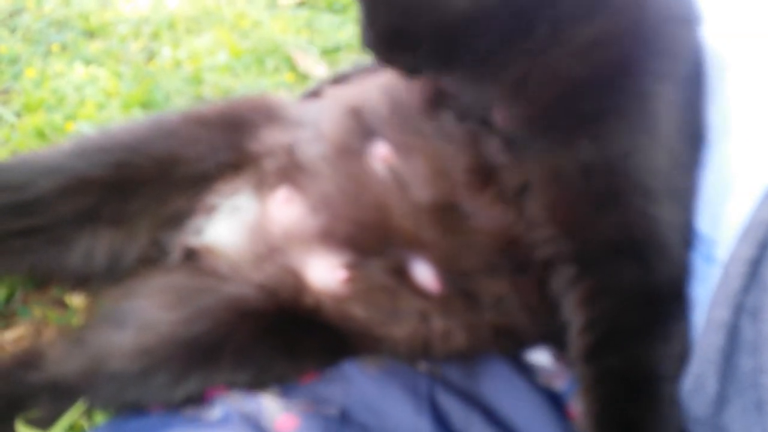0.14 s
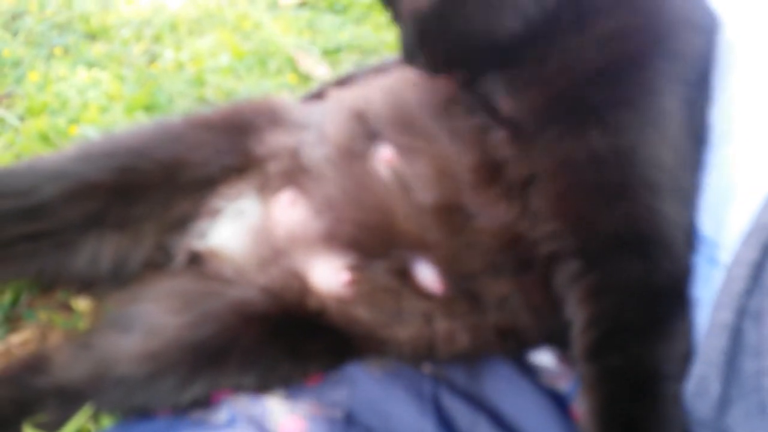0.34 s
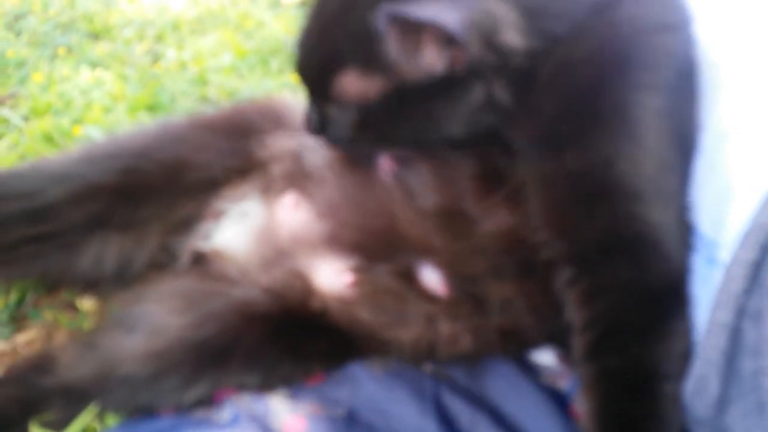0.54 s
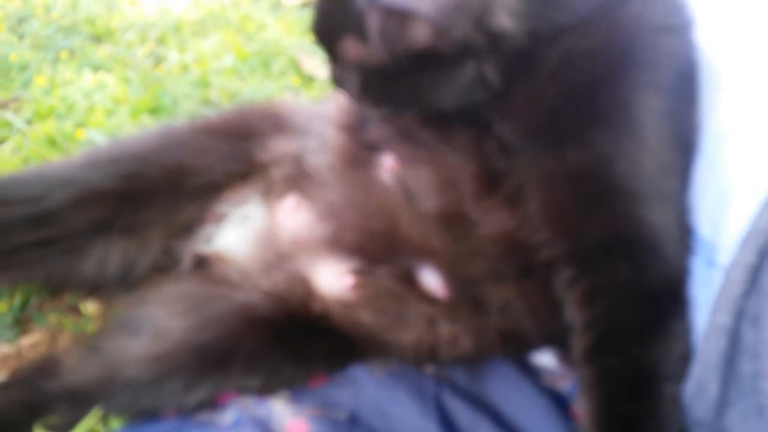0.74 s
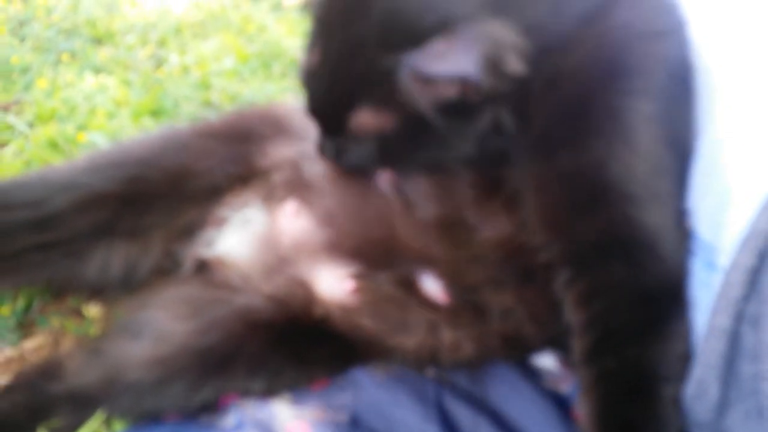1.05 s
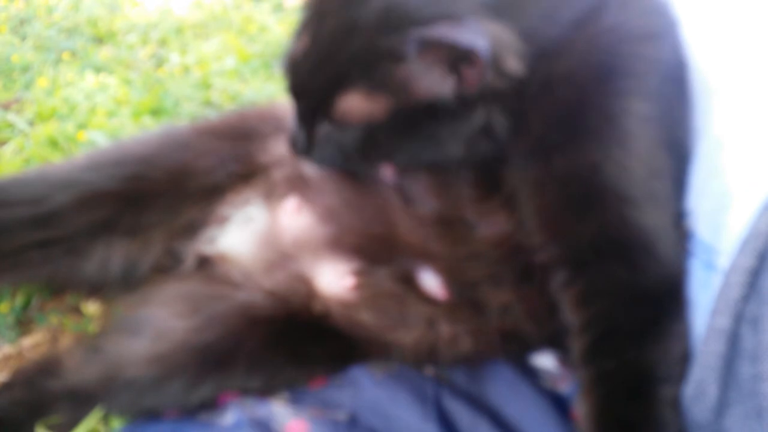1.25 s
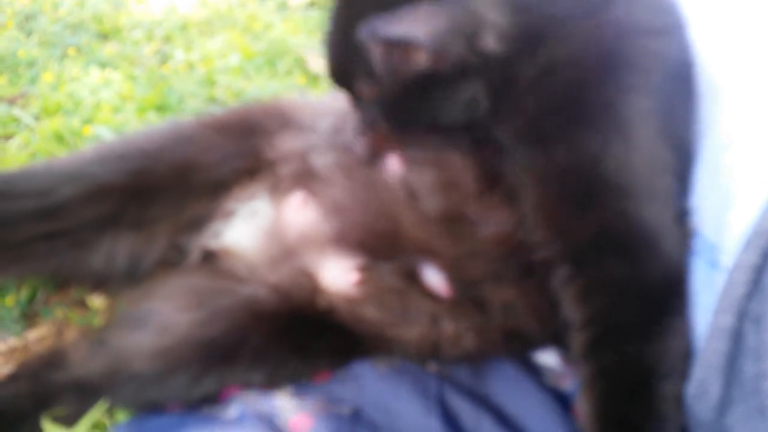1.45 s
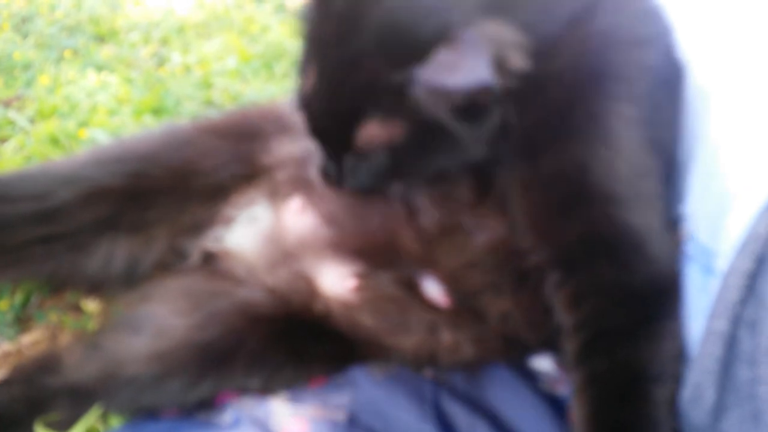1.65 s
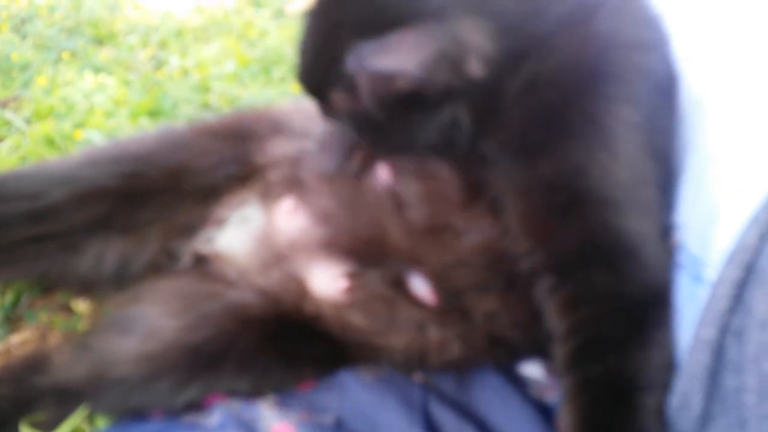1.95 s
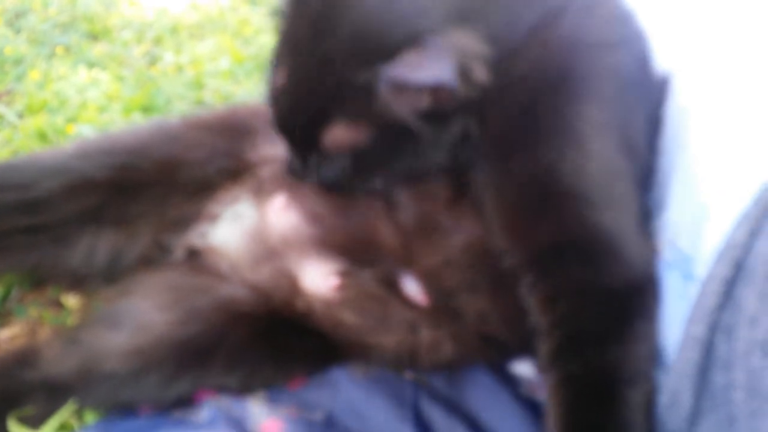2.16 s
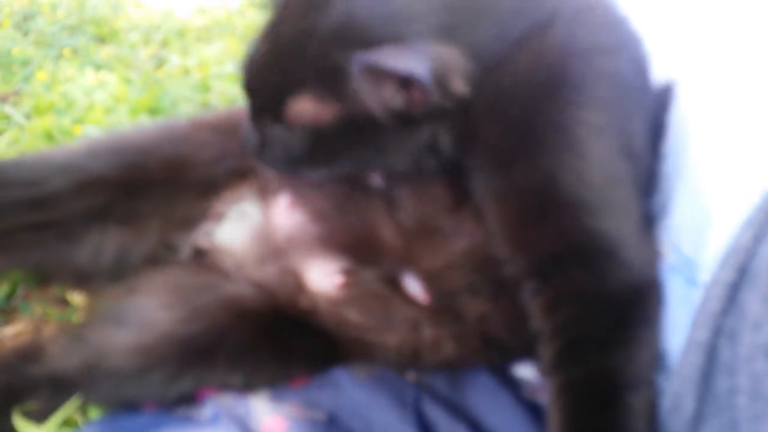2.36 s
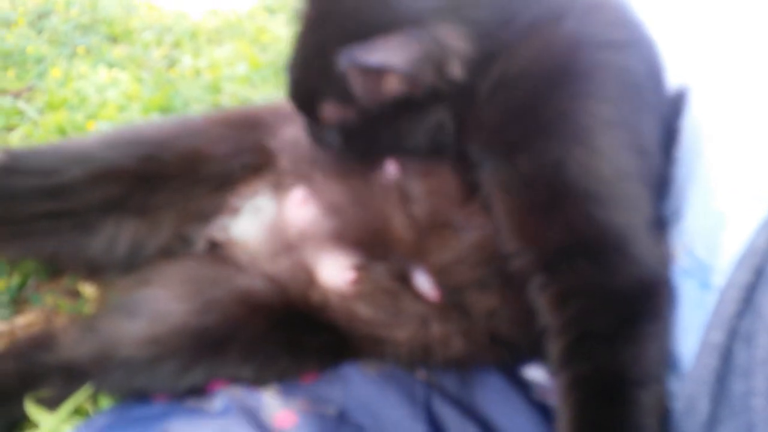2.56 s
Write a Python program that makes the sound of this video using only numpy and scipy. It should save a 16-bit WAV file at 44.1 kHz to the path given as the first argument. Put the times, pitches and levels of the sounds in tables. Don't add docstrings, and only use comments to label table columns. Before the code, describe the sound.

Outdoors, near a handheld stereo recorder with one side partly covered, an engine rumbles at idle with faint metallic clinks, then climbs in pitch to a fuller, rougher roar with stronger breathy hiss and thin gear whine.

```python
import sys
import numpy as np
from scipy import signal
from scipy.fft import rfft, irfft
from scipy.io import wavfile

SR = 44100
rng = np.random.default_rng(int(sys.argv[2]) if len(sys.argv) > 2 else 0)


def voltage_ratio(decibels):
    exponent = np.asarray(decibels, float) / 20
    return 10 ** exponent


def materialize(psi):
    bounded = np.clip(np.atleast_2d(psi).T, -1, 1)
    quanta = np.round(bounded * 32767).astype(np.int16)
    wavfile.write(sys.argv[1], SR, quanta)


N = 119070
TIME = np.arange(N) / SR
HZ = np.maximum(np.fft.rfftfreq(N, 1 / SR), 1)
PORT_SIGNS = np.array([[1], [-1]])
TICK_S, TICK_LENGTH_S = 2.019, 0.0045

# time_s, pitch_hz, level_db
SPEED = [(0, 183, -32), (.5, 181, -31.5), (.72, 182, -27.5), (.85, 184, -29), (1.0, 197, -27.5),
         (1.15, 235, -27), (1.3, 264, -28), (1.5, 254.5, -28), (1.8, 254.8, -23.5), (2.32, 255.2, -21.5),
         (2.52, 254.6, -19.5), (2.62, 254.6, -21), (2.7, 254.6, -24)]
# time_s, level_db
FLOW = [(0.0, -42), (0.03, -45.5), (0.19, -44.5), (1.06, -42), (1.33, -36), (1.5, -38), (2.02, -37.5),
        (2.37, -38.5), (2.53, -37), (2.7, -38.5)]


def rms_one(x):
    return x / np.sqrt(np.mean(x ** 2) + 1e-20)


def in_time(rows):
    s, *columns = np.transpose(rows)
    return [np.interp(TIME, s, column) for column in columns]


def over_hz(points):
    hz, values = np.transpose(points)
    return np.interp(np.log(HZ), np.log(hz), values)


def humps(rows):
    return sum(db / (1 + (2 * (HZ - hz) / width) ** 2) for hz, width, db in rows)


def bell(centre_s, length_s):
    return np.exp(-0.5 * ((TIME - centre_s) / length_s) ** 2)


def slow(rate_hz):
    return rms_one(irfft(rfft(rng.standard_normal(N)) / (1 + (HZ / rate_hz) ** 4), N))


def stereo_noise(colour_db):
    # frequency_hz, likeness (0 to 1)
    likeness = [(60, 0.98), (140, 0.94), (320, 0.94), (730, 0.35), (1670, 0.092), (3840, 0.051),
                (8820, 0.01)]
    # frequency_hz, lead_rad
    lead = [(30, 0), (400, .05), (780, .22), (1550, -1.8), (2070, .9), (3100, .3), (4050, -3), (6120, 1.5)]
    # frequency_hz, difference_db
    lean = [(60, -0.5), (120, 0), (250, 4.5), (510, 2), (1040, 8.5), (2120, 2), (4320, 2.5), (8820, -10)]
    alike = np.sqrt(np.clip(over_hz(likeness), 0, 1))
    mid, side = rfft(rng.standard_normal((2, N)))
    pair = np.sqrt(1 + alike) * mid + np.sqrt(1 - alike) * side * PORT_SIGNS
    pair = pair * np.exp(0.5j * over_hz(lead) * PORT_SIGNS)
    return rms_one(irfft(pair * voltage_ratio(colour_db + over_hz(lean) / 2 * PORT_SIGNS), N))


def band(hz, width_hz, evenness=0):
    phase = 2 * np.pi * np.cumsum(hz + 0 * TIME) / SR
    sway = slow(width_hz) - 1j * slow(width_hz)
    wave = np.real(sway * np.exp(1j * phase))
    return rms_one(wave / (np.abs(sway) + 0.01) ** np.clip(evenness, 0, 1))


def exhaust_band(hz, width_hz):
    return band(hz, width_hz, 0.56)


def lull():
    # centre_s, length_s, depth_db
    dips = [
        (2.62, 0.033, -12),
        (1.03, 0.022, -10),
        (1.43, 0.021, -13),
        (1.8, 0.015, -8.5),
        (.38, 0.026, -5),
        (3.1, .02, -6),
        (.89, 0.015, -3),
    ]
    return voltage_ratio(sum(db * bell(s, length) for s, length, db in dips))


def orders():
    hz, level_db = in_time(SPEED)
    phase = 2 * np.pi * np.cumsum(hz) / SR
    fourth = voltage_ratio(level_db + 1.6 * slow(5)) * np.sin(phase + 0.15 * slow(4))
    first = lull() * voltage_ratio(-39 + 1.2 * slow(1.8)) * np.sin(phase / 4)
    return np.sqrt(2) * (fourth + first)


def roar():
    # time_s, roar_db, brightness_db
    load = [
        (0.0, -23.5, -11),
        (0.1, -23.5, -11.5),
        (0.35, -26.5, -15),
        (0.39, -21, -18),
        (0.9, -24, -8),
        (1.25, -19, 0.5),
        (2.09, -15, -7),
        (2.59, -18, -1.5),
        (2.7, -18, -3),
    ]
    # frequency_hz, density_db
    spectrum = [(53, -36.5), (90, -7), (242, -2.5), (296, -7), (364, -3.5), (463, -9.5), (618, -15.5),
                (680, -20.5), (1600, -48), (2080, -77.5), (3520, -120)]
    # centre_hz, width_hz, boost_db
    body = [(167, 38, 7), (365, 104, 4), (300, 22, -1), (102, 44, -6.5), (70.4, 31, 2), (130, 30, 6.5)]
    level_db, bright_db = in_time(load)
    full = rfft(stereo_noise(over_hz(spectrum) + humps(body)))
    upper = 1 / (1 + (384 / HZ) ** 6)
    low = irfft(full * (1 - upper), N)
    high = irfft(full * upper, N)
    return voltage_ratio(level_db - 4 + 0.17 * slow(2.5)) * (low + high * voltage_ratio(bright_db + 4.5))


def boom():
    # time_s, pitch_hz, level_db
    note = [(0, 119.8, -32.5), (.5, 130, -36.5), (.95, 135, -39.5), (1.1, 193.5, -38), (1.3, 196.4, -23.5),
            (1.5, 194.8, -27.5), (1.7, 209.2, -24), (1.8, 190, -25), (1.92, 208.1, -23.5),
            (2.1, 200.1, -20), (2.28, 197, -19.5), (2.42, 185.9, -26), (2.7, 195, -26)]
    hz, level_db = in_time(note)
    return voltage_ratio(level_db + 2) * exhaust_band(hz, 21.3)


def rumble():
    # frequency_hz, density_db
    spectrum = [(12, -75.5), (20, -33.5), (50, 1.5), (91, -1), (130, 1.5), (170, -49), (290, -120)]
    return lull() * voltage_ratio(-34 + 0.58 * slow(1.4)) * stereo_noise(over_hz(spectrum))


def fan_hiss():
    # frequency_hz, density_db
    spectrum = [(530, -3.5), (900, -2), (1490, -9), (1850, -9.5), (2320, -13), (3170, -12), (4960, -16),
                (7780, -17.5), (9270, -24), (12100, -42), (20400, -120)]
    # centre_hz, width_hz, boost_db
    left_port = [(7070, 2000, 12.5), (3270, 1100, 1), (1525, 100, -6.5), (4630, 220, 2), (9450, 360, 4),
                 (6240, 460, 2)]
    right_port = [(7750, 350, 9), (2005, 134, 6.2), (6500, 160, 2), (1850, 260, 2), (7230, 400, 4.5)]
    flow_db, = in_time(FLOW)
    ports_db = np.array([humps(left_port), humps(right_port)])
    air = voltage_ratio(flow_db + 3.5 + 0.5 * slow(8.2)) * stereo_noise(over_hz(spectrum) + ports_db)
    peak_hz, peak_width_hz, peak_idle_db = 7540, 820, -5
    peak = irfft(rfft(air) / (1 + (2 * (HZ - peak_hz) / peak_width_hz) ** 4), N)
    peak_db = np.interp(in_time(SPEED)[0], [200, 250], [peak_idle_db, 0])
    return air + peak * (voltage_ratio(peak_db) - 1)


def grip():
    # time_s, pitch_hz, level_db
    cavity = [(0, 7800, -53), (.3, 8250, -53.5), (.62, 8150, -53), (.8, 8900, -58), (1.15, 9200, -58),
              (1.3, 9200, -75), (2.7, 9200, -80)]
    hz, level_db = in_time(cavity)
    return voltage_ratio(level_db + [[-8], [0]]) * band(hz, 300)


def swells():
    # centre_s, length_s, pitch_hz, level_db, side (-1 left, 1 right)
    eddies = [(2.53, .09, 3300, -42, -1), (1.38, .08, 7950, -44.5, 1), (1.62, .08, 1900, -44.5, 1),
              (2.05, .15, 6100, -46, -1), (1.3, .05, 2800, -47, 1), (2.55, .08, 4200, -50, 1),
              (1.35, .1, 800, -44, -1), (1.36, .08, 6700, -47, -1), (.36, .03, 3350, -50, -1),
              (2.5, .1, 6200, -48, -1), (1.6, .12, 6500, -48, -1), (1.8, .15, 5800, -51, -1),
              (1.6, .12, 7200, -49, 1), (.15, .15, 1500, -52, -1), (.2, .15, 1300, -53, 1),
              (.3, .2, 2800, -54, -1), (.4, .15, 2800, -56, 1), (1.65, .07, 2700, -52, 1),
              (2.55, .1, 3600, -52, 1), (1.15, .07, 1800, -51, 1), (2.69, .03, 3100, -46, -1),
              (2.3, .15, 1900, -50, 1)]
    out = np.zeros((2, N))
    for s, length, hz, db, side in eddies:
        out[int(side > 0)] += voltage_ratio(db) * bell(s, length) * band(hz, 210)
    return out


def self_noise():
    # level_db, centre_hz, width_hz
    noise_db = [
        [-58.5],
        [-60.5],
    ]
    centre_hz = [
        [11000],
        [10800],
    ]
    spread_hz = [
        [1500],
        [2200],
    ]
    main = 1 / (1 + ((HZ - centre_hz) / spread_hz) ** 4)
    airy_top = 0.73 / (1 + ((HZ - 13600) / 700) ** 4)
    air = rms_one(irfft(rfft(rng.standard_normal((2, N))) * (main + airy_top), N))
    change_db = -1.6 * (TIME > 0.9) + 1.5 * (TIME > 1.7)
    return voltage_ratio(noise_db + change_db) * air


def throbs():
    # start_s, peak_db, pitch_hz
    firings = [(0.08, -13, 116), (0.16, -20, 143), (0.307, -19, 161), (0.389, -16, 175), (0.409, -14, 180),
               (0.448, -12, 170), (0.574, -19, 170), (0.631, -13.5, 187), (0.664, -16, 191),
               (0.699, -16, 181), (0.734, -12, 199), (0.806, -14.5, 184), (0.935, -16, 184),
               (0.974, -14, 190), (1.015, -17, 196), (1.068, -15, 202), (1.164, -8, 164),
               (1.214, -11.5, 213), (1.254, -7, 180), (1.534, -7.5, 397), (1.568, -13, 192),
               (1.672, -7, 211), (1.814, -7, 183), (1.859, -7.5, 213), (1.887, -5, 211), (1.954, -8, 201),
               (2.037, -6.5, 253), (2.109, -5, 207), (2.195, -8, 167), (2.224, -9, 202.1), (2.274, -6, 210),
               (2.387, -3.5, 250.1), (2.489, -8, 242), (2.521, -3, 247), (2.564, -8, 266.8),
               (2.589, -7.5, 188)]
    rise_s, fall_s = 0.0044, 0.011
    out = np.zeros(N)
    for s, db, hz in firings:
        span = slice(int(s * SR), int(s * SR) + 4000)
        age = np.maximum(TIME[span] - s, 0)
        envelope = (1 - np.exp(-age / rise_s)) * np.exp(-age / fall_s)
        out[span] += voltage_ratio(db - 2) * envelope * np.sin(2 * np.pi * hz * age)
    return out


def clinks():
    # start_s, level_db, brightness_db_per_octave
    knocks = [
        (.115, -54, -10),
        (.505, -55, 8),
        (.875, -49.5, -12),
    ]
    # pitch_hz, level_db, t60_s
    modes = [(4012, 0, .35), (4950, -4, .4), (5920, -1.5, .3), (2762, -11, .6), (7003, -6, .3)]
    out = np.zeros(N)
    for s, db, tilt_db in knocks:
        age = np.maximum(TIME - s, 0)
        for hz, mode_db, t60 in modes:
            bright_db = tilt_db * np.log2(hz / modes[0][0])
            out += voltage_ratio(db + mode_db + bright_db - 60 * age / t60) * np.sin(2 * np.pi * hz * age)
    return out * voltage_ratio(1.5 * PORT_SIGNS)


def surges():
    # centre_s, length_s, pitch_hz, level_db
    modes = [(0.562, 0.044, 310, -33), (1.3, 0.089, 140, -25), (1.057, 0.092, 410, -34.5),
             (1.572, 0.039, 410, -28), (1.88, 0.059, 460, -28.5), (2.2, 0.08, 310, -27.5),
             (2.09, 0.083, 550, -36.5), (0.67, 0.092, 85, -40), (0.256, 0.053, 280, -36.5),
             (2.45, 0.064, 670, -40), (0.78, 0.068, 180, -28), (1.775, 0.12, 520, -36),
             (2.6, 0.22, 290, -30), (.95, 0.082, 690, -49), (1.215, 0.055, 75, -30),
             (0.36, 0.065, 540, -50.5)]
    return sum(voltage_ratio(db) * bell(s, length) * exhaust_band(hz, 14) for s, length, hz, db in modes)


def gear_whine():
    from_s, to_s, rise_s = 1.43, 2.5, 0.15
    rise = np.clip(np.minimum(TIME - from_s, to_s - TIME + rise_s) / rise_s, 0, 1)
    tone = np.sin(2 * np.pi * 623 * TIME + 1.1 * slow(4))
    return np.sqrt(2) * rise * voltage_ratio(-41.5 + 4 * slow(9)) * tone * voltage_ratio(1.5 * PORT_SIGNS)


def handling_tick():
    treble = rfft(rng.standard_normal((2, N))) / (1 + (9500 / HZ) ** 8)
    return voltage_ratio(-59) * rms_one(irfft(treble, N)) * bell(TICK_S, TICK_LENGTH_S)


def scene():
    exhaust = roar() + boom() + throbs() + surges()
    engine = orders() + exhaust + rumble() + gear_whine() + clinks()
    air = fan_hiss() + grip() + swells()
    return engine + air + self_noise() + handling_tick()


def sparse_treble(x):
    padded = np.pad(x, [(0, 0), (0, 2048)], "reflect")
    frame = dict(window="cosine", nperseg=2048, noverlap=1024)
    hz, s, parts = signal.stft(padded, SR, boundary="even", padded=False, **frame)
    flow_db, = in_time(FLOW)
    follow_db = 0.4 * (flow_db - flow_db.mean()) + 0.8 * slow(8)
    limit_db = -77.5 + np.interp(s, TIME, follow_db)
    weak = (np.abs(parts) < voltage_ratio(limit_db)) & (hz[:, None] > 9000)
    weak = weak & (np.abs(s - TICK_S) > 2 * TICK_LENGTH_S)
    return signal.istft(parts * ~weak, SR, **frame)[1][:, :N]


def band_limit(x):
    return signal.sosfilt(signal.butter(12, 14300, fs=SR, output="sos"), x)


def record(dry):
    overload = 1.1
    thinned = sparse_treble(overload * np.tanh(dry / overload))
    fade = np.clip(np.minimum(TIME, TIME[::-1]) / 0.003, 0, 1)
    return band_limit(thinned * fade)


dry = scene()
out = record(dry)
materialize(out)
```